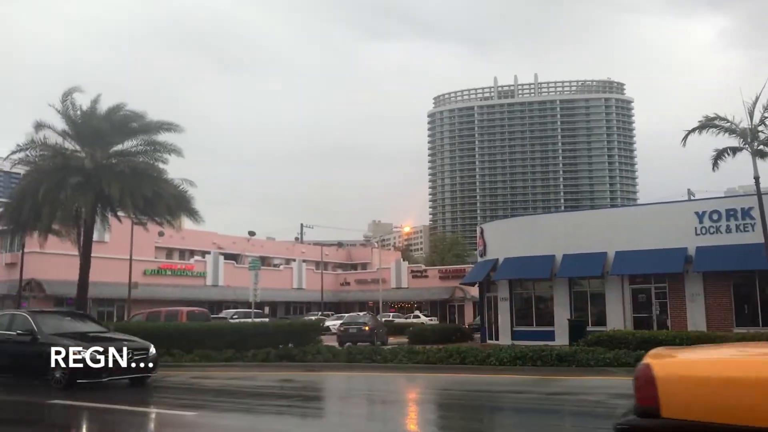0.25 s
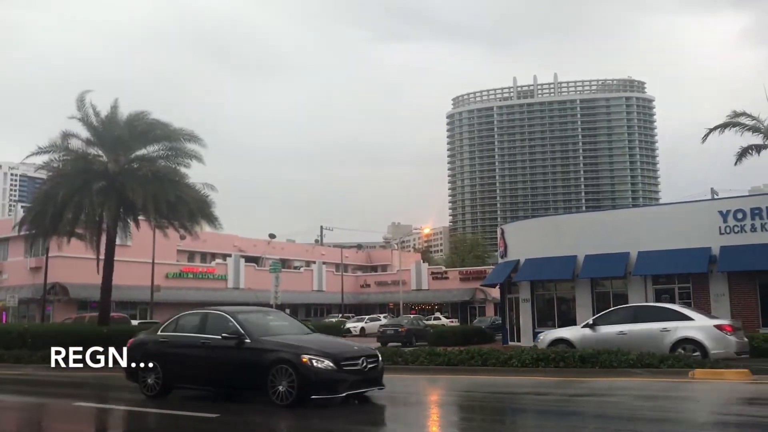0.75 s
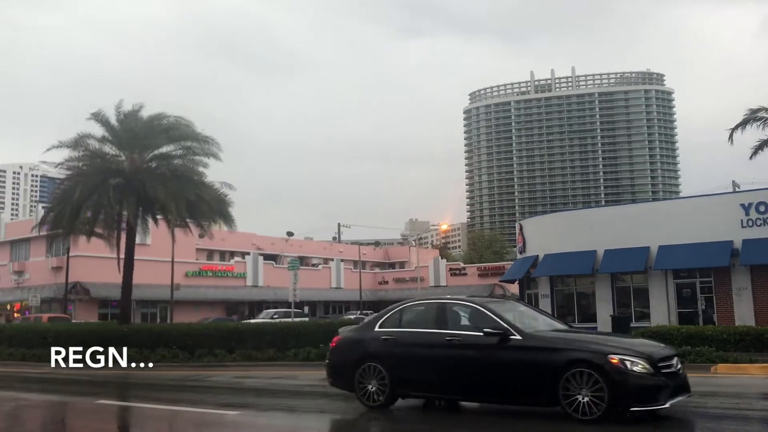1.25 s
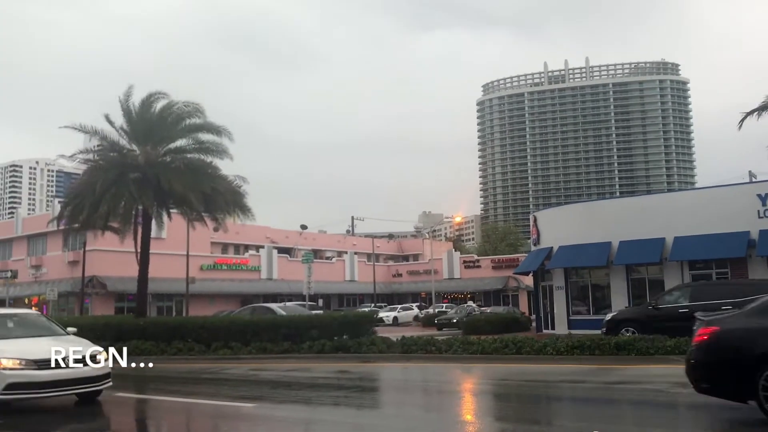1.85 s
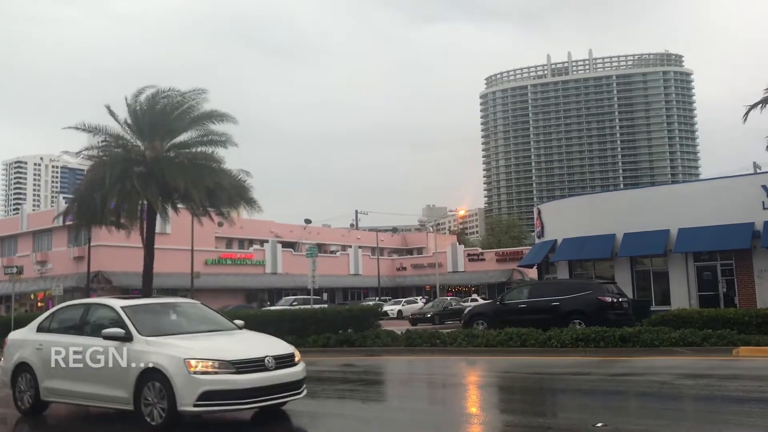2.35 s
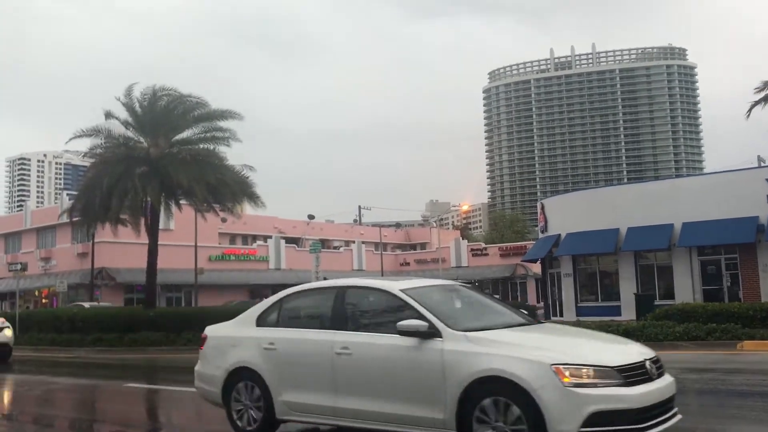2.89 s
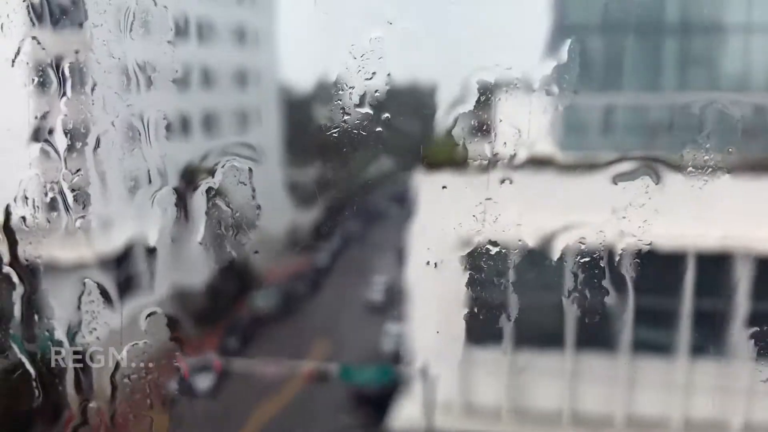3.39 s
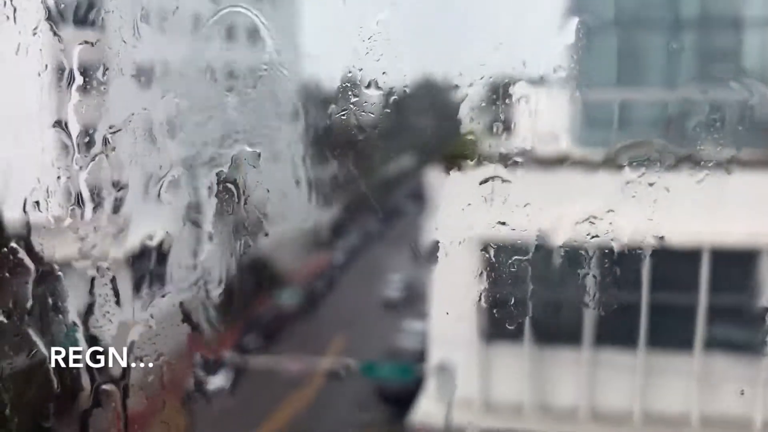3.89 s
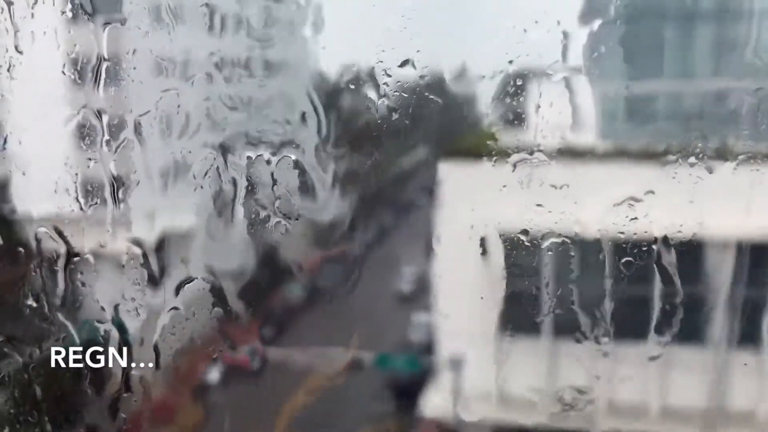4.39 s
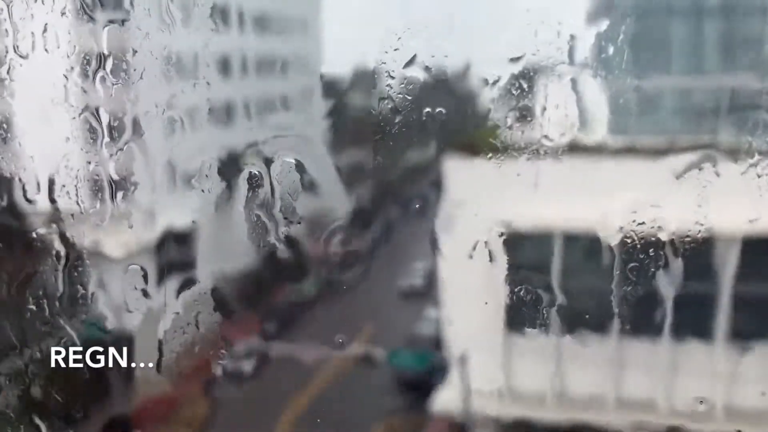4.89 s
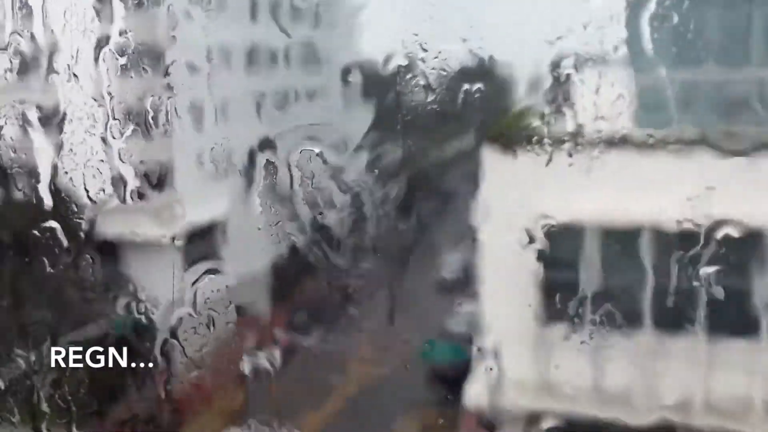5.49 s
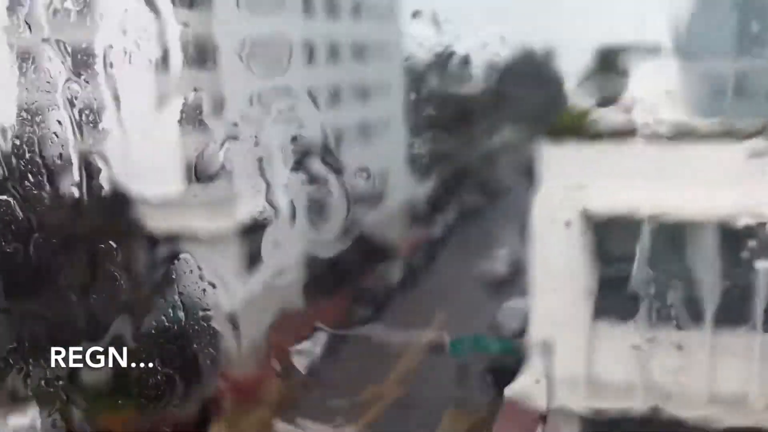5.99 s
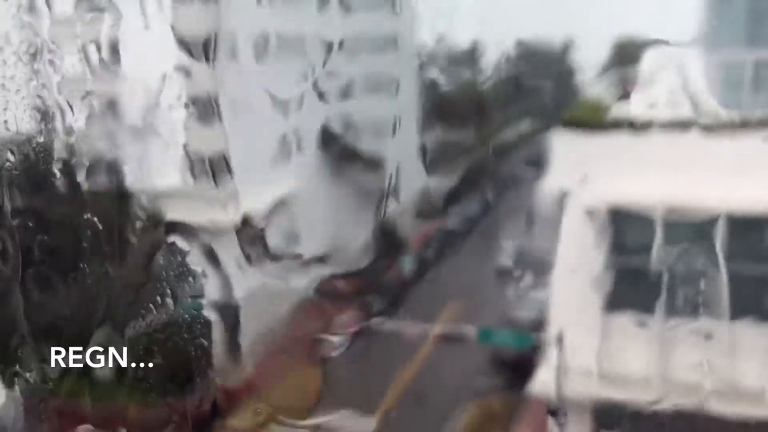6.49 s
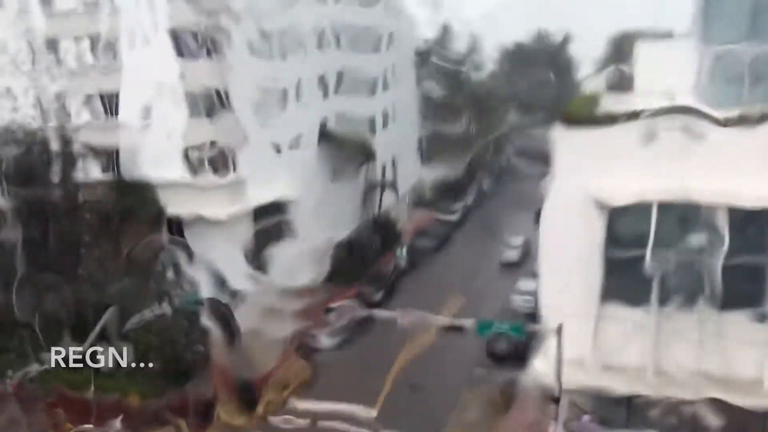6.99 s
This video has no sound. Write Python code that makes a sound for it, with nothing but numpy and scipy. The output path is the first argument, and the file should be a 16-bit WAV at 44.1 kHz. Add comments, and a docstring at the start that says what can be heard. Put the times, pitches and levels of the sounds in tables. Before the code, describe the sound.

Two joined rainy places, plain handheld microphone, mono. First the roadside: continuous watery tyre hiss, low car rumbles swelling and fading, an engine pulling away, one early handling thud. The street stops dead after about three seconds. Then inside by a window: quiet low drone and distant rain, faint tiny pings, irregular sheets of drops crackling on the pane, and sharp short taps with bright splashes, increasingly strong and glassy.

```python
"""Heavy rain in town, mono: drops as random decaying noise bursts, shaped in bands.
First, at the kerb, tyre spray hisses over noise rumble, an engine of wavering sine orders pulls away
and a thud of brief low sines bumps the microphone. After a short silence, indoors: gusts fling sheets
of drops at a pane, fat drops tick as a pitched ring, crack and spit of noise, faint sine pings sound,
one soft low thud falls, and the building rumbles (noise) and drones (wavering sines)."""
import sys
import numpy as np
from scipy import signal
from scipy.fft import rfft, irfft, next_fast_len
from scipy.io import wavfile
from scipy.ndimage import map_coordinates

SR = 44100
rng = np.random.default_rng(int(sys.argv[2]) if len(sys.argv) > 2 else 0)


def to_wav(s):
    """Save 16-bit WAV."""
    ch = np.atleast_2d(s).T  # columns
    pcm = np.round(np.clip(ch, -1, 1) * 32767)  # PCM
    wavfile.write(sys.argv[1], SR, pcm.astype(np.int16))


N = 319725
TIME_S = np.arange(N) / SR
STREET_END_S, WINDOW_START_S = 3.152, 3.204

# street noise spectra, relative: (frequency [Hz], density [dB per Hz])
ROAR_SPECTRUM = [(300, -12), (480, -7), (700, -2), (950, -0.5), (1350, -4), (1900, -8), (2800, -26)]
ROAD_RUMBLE_SPECTRUM = [(31, -16), (38, 0), (47, 0), (70, -2), (100, -4), (140, -5.5), (220, -28)]
CAR_BODY_SPECTRUM = [(90, -3.5), (140, -4.5), (230, 3.5), (310, -1), (420, -11.5), (650, -28)]
# street drop shaping, relative: (frequency [Hz], gain [dB])
SLOSH_SHAPE = [(1000, -15.5), (1700, -5), (2500, -3), (3200, -2.5), (4300, -16.5)]
SPRAY_SHAPE = [(2300, -18.5), (3400, -2), (4300, -1), (6300, -3.5), (7800, -11.5), (11000, -22)]
MIST_SHAPE = [(5000, -12.5), (7200, -1.5), (8700, -2.5), (11500, -3.5), (13500, -5), (16000, -9.5)]

# water thrown up by tyres, before trims: (time [s], spray level [dB], fine mist level [dB])
TYRE_WASH = [(0.0, -30, -32), (0.02, -31.5, -34), (0.08, -31.5, -31), (0.1, -35, -38), (0.17, -33.5, -37.5),
             (0.54, -33, -36), (1.29, -36, -39.5), (1.39, -33.5, -36), (1.59, -34, -38), (2.97, -32, -34.5),
             (3.12, -32.5, -34.5), (3.13, -35, -37)]
# level at the mean spray level, and dB per dB of spray swing
ROAR_DB, ROAR_FOLLOWS = -36, 0.36
SLOSH_DB, SLOSH_FOLLOWS = -35.5, 0.6
# roar and slosh dip briefly after the bump
DIP_S, DIP_DB, DIP_RECOVERY_S = 0.11, -5, 0.19

# cars rumble by: (peak [s], deep rumble level [dB], body noise level [dB], rise [s], fall [s])
CAR_PASSES = [(0.12, -29.5, -38, 0.65, 0.18), (0.48, -38, -32.5, 0.14, 0.55), (1.05, -32, -37, 0.25, 0.3),
              (1.63, -28.5, -37.5, 0.47, 0.5), (2.55, -34, -36, 0.73, 0.36), (3.0, -29.5, -35, 0.23, 0.24)]
# engine picks up speed evenly; its orders swell in turn
ENGINE_START_HZ, ENGINE_HZ_PER_S = 62.77, 6.4
# (order [multiple of base frequency], peak [s], level [dB], rise [s], fall [s])
ENGINE_ORDER_SWELLS = [(1, 0.28, -31, 0.11, 0.08), (1, 1.04, -25, 0.24, 0.47), (2, 1.415, -29, 0.78, 0.37),
                       (3, 1.42, -38, 1.5, 0.52)]
# nearest car booms as it draws level, rising in pitch
BOOM_S, BOOM_DB, BOOM_RISE_S, BOOM_FALL_S = 3.08, -23.5, 0.085, 0.28
BOOM_HZ, BOOM_HZ_PER_S = 87.6, 100

# low thuds, a bump on the microphone at the kerb, later one soft low thud indoors:
# (time [s], frequency [Hz], level [dB], half length [s])
THUD_MODES = [(0.0885, 168, -11.5, 0.007), (0.0885, 350, -16, 0.0045), (0.0875, 540, -21, 0.0035),
              (6.03, 158, -33, 0.04)]

# indoor noise spectra, relative: (frequency [Hz], density [dB per Hz])
ROOM_RUMBLE_SPECTRUM = [(31, -19), (38, 2), (46, 3.5), (62, -4.5), (85, 3), (115, -1.5), (160, -6.5),
                        (250, -10.5), (350, -13.5), (520, -27), (1000, -27)]
FAR_RAIN_SPECTRUM = [(400, 3.5), (1000, -1.5), (2000, -4.5), (4000, -10.5), (6500, -11.5), (9500, -15),
                     (16000, -17)]
FAR_RAIN_DB = -49
ROOM_RUMBLE_DB, ROOM_EASES_DB_PER_S = -34, 1.04
LOWER_DRONE_HZ, UPPER_DRONE_HZ = 63.9, 100.4
# lower drone: (time [s], level [dB])
LOWER_DRONE_LEVEL = [(3.2, -27), (4.05, -27.5), (4.4, -32.5), (5.45, -39), (5.75, -54), (6.1, -35),
                     (6.75, -44), (7.25, -32.5)]
# upper drone holds its level and swells once
UPPER_DRONE_DB, UPPER_SWELL_S, UPPER_SWELL_DB = -44.5, 7.04, -31

# pane drop shaping, relative: (frequency [Hz], gain [dB])
PATTER_SHAPE = [(130, 0), (300, 1.5), (470, -3), (640, -1), (850, -1.5), (1400, -0.5), (2200, -3),
                (3000, -10.5), (4500, -21)]
CRACKLE_SHAPE = [(1700, -13), (2600, 1), (3400, -0.5), (4400, -1.5), (5400, -8), (6500, -12), (9000, -10.5)]
SPLASH_SHAPE = [(4800, 4), (6800, 3), (8500, -3), (12000, 2.5), (14000, -3), (16000, -10)]
SPATTER_SHAPE = [(1200, -4), (2400, 9), (4200, 6), (6200, 3), (8500, -1), (12500, 3), (16000, -2)]
# sheets of drops, before clumping and trims:
# (peak [s], patter level [dB], fine splash level [dB re patter], rise [s], fall [s])
GUST_SHEETS = [(3.611, -41, -17, 0.002, 0.016), (3.85, -37.5, -10, 0.029, 0.051),
               (3.955, -32, -15, 0.04, 0.082), (4.155, -38, -13, 0.071, 0.077),
               (4.33, -39.5, -9, 0.015, 0.035), (4.392, -35, -17, 0.0089, 0.034),
               (4.438, -31.3, -3.5, 0.028, 0.09), (4.605, -35, -10.5, 0.12, 0.19),
               (4.84, -34, -7, 0.035, 0.033), (4.975, -37, -10.5, 0.03, 0.2),
               (5.17, -35.5, -6, 0.16, 0.049), (5.36, -43, -17, 0.19, 0.089),
               (5.52, -29.5, -11.5, 0.072, 0.093), (5.598, -31.5, -4.5, 0.065, 0.015),
               (5.775, -39, -14, 0.063, 0.15), (5.9, -36, -12, 0.15, 0.12), (6.148, -28, -8.5, 0.1, 0.036),
               (6.285, -34.5, -8.5, 0.19, 0.051), (6.535, -31.5, -9.5, 0.18, 0.12),
               (6.65, -32.5, -6, 0.11, 0.036), (6.8, -35, -9, 0.1, 0.14), (7.055, -31.5, -9, 0.039, 0.096),
               (7.21, -31, -11, 0.068, 0.12)]
# splash trails its gust; levels waver together as drops clump
SPLASH_LAG_S, CLUMP_RMS_DB, CLUMP_KNOTS_PER_S = 0.0035, 0.75, 46
# crackle at the reference patter level, and dB per dB of patter
GUST_REFERENCE_DB, CRACKLE_DB, CRACKLE_FOLLOWS = -36, -40.5, 0.91
# pane and frame resonances: (frequency [Hz], width [Hz], level before drive [dB])
PANE_MODES = [(3400, 350, -10.5), (4550, 260, -16)]
# pane rings more as the rain goes on: (time [s], drive [dB re crackle])
PANE_DRIVE = [(4.8, -29), (6.4, -2.5)]
# small drops between gusts
DRIZZLE_DB, DRIZZLE_PER_S = -59, 40

# faint thin pings: (time [s], level [dB])
PING_ONSETS = [(3.227, -48), (3.275, -55), (3.323, -54), (4.215, -49)]
# partials of each ping: (frequency [Hz], level [dB re ping])
PING_TONES = [(8430, -1.7), (13300, 0)]

# fat drops on glass, before delay and trims:
# (time [s], ring level [dB], ring frequency [Hz], splash level [dB])
FAT_DROPS = [(3.2291, -30, 1990, -56), (3.5015, -33, 1910, -60), (3.6084, -31.5, 1900, -45),
             (3.7936, -33.5, 2140, -50), (4.0087, -28, 2040, -31), (4.07, -25, 2460, -29.5),
             (4.308, -23.5, 3240, -55), (4.3124, -17.5, 3930, -54), (4.4528, -23, 2510, -26),
             (4.4634, -20.5, 2100, -36), (4.7235, -24.5, 2030, -31.5), (4.7915, -30, 3800, -42),
             (4.8378, -25, 2530, -22), (4.9693, -26.5, 3860, -39), (5.0373, -22.5, 6040, -32),
             (5.0878, -32, 3750, -25.5), (5.169, -19, 2300, -27), (5.2032, -26, 2010, -25),
             (5.6065, -15.5, 2620, -39), (5.7272, -28, 2070, -31), (5.897, -26.5, 3030, -31),
             (6.2194, -23, 2420, -35), (6.535, -16, 1800, -44), (6.682, -15.5, 3050, -26),
             (6.97, -16.5, 3900, -44), (7.1878, -26, 3420, -33)]
# time for the ring's exponential factor to fall 60 dB
RING_EXP_T60_S = 0.005
# spit of water: a snap, then a weaker spatter
SNAP_T60_S, SPIT_T60_S, SPIT_TAIL_DB = 0.003, 0.02, -12.5

# microphone port dips: (frequency [Hz], width [Hz], depth [0-1])
MIC_PORT_DIPS = [(4960, 210, 0.4), (7720, 600, 0.35), (10350, 1020, 0.5)]
CUTOFF_HZ = 15850


def from_db(db):
    """Decibels to amplitude gain."""
    return 10 ** (np.asarray(db) / 20)


def rms_one(x):
    """Scale to rms 1."""
    return x / np.sqrt(np.mean(x ** 2) + 1e-20)


def in_time(rows):
    """Interpolate each column of a curve at every sample."""
    time_s, *columns = np.transpose(rows)
    return [np.interp(TIME_S, time_s, column) for column in columns]


def swell(peak_s, rise_s, fall_s):
    """Exponential rise to gain 1 and exponential fall, one time constant per side."""
    before = (peak_s - TIME_S) / rise_s
    after = (TIME_S - peak_s) / fall_s
    return np.exp(-np.maximum(before, after).clip(0, 30))


def drift(knots_per_s):
    """Smooth random curve through evenly spaced random knots; rms 1."""
    knots = rng.standard_normal(4096)
    position = TIME_S[::32] * knots_per_s + 2
    curve = map_coordinates(knots, [position], order=3, mode="wrap")
    return rms_one(curve).repeat(32)[:N]


def colour(x, spectrum):
    """Filter to a gain curve with steep skirts past its ends; rms 1."""
    hz, db = np.transpose(spectrum)
    size = next_fast_len(N)
    f_hz = np.maximum(np.fft.rfftfreq(size, 1 / SR), 1)
    skirts = np.minimum(f_hz / hz[0], 1) ** 2 * np.minimum(hz[-1] / f_hz, 1) ** 2
    gain = from_db(np.interp(np.log(f_hz), np.log(hz), db)) * skirts
    return rms_one(irfft(rfft(x, size) * gain, size)[:N])


def noise(spectrum):
    """Steady Gaussian noise with a spectrum; rms 1."""
    return colour(rng.standard_normal(N), spectrum)


def band(x, low_hz, high_hz):
    """Causal Butterworth band-pass."""
    sos = signal.butter(2, [low_hz, high_hz], "band", fs=SR, output="sos")
    return signal.sosfilt(sos, x)


def resonance(x, hz, width_hz):
    """Two-pole resonance; rms 1."""
    return rms_one(signal.lfilter(*signal.iirpeak(hz, hz / width_hz, fs=SR), x))


def drops(shape, per_s, size_db, tint_db, t60_s):
    """Random impacts, each a decaying noise burst with its own size and band balance; rms 1."""
    at = np.flatnonzero(rng.random(N) < per_s / SR)
    # columns 0-7 tint the bands, the last sets drop size
    chance = np.clip(rng.standard_normal((len(at), 9)), -2.5, 2.5)
    edges_hz = [100, 600, 1200, 2000, 3000, 4500, 7000, 11000, 18000]
    energy_decay = from_db(-60 / t60_s / SR) ** 2
    out = np.zeros(N)
    for k, (low_hz, high_hz) in enumerate(zip(edges_hz, edges_hz[1:])):
        energy = np.zeros(N)
        energy[at] = from_db(size_db * chance[:, -1] + tint_db * chance[:, k]) ** 2
        energy = signal.lfilter([1], [1, -energy_decay], energy + 1e-12)
        envelope = np.sqrt(energy / energy.mean())
        out += envelope * band(rng.standard_normal(N), low_hz, high_hz)
    return colour(out, shape)


def wavering_tone(hz, flutter, knots_per_s):
    """Sine with random in-phase and quadrature parts, unsteady in strength and phase; rms 1."""
    phase = 2 * np.pi * np.cumsum(hz + np.zeros(N)) / SR
    in_phase = (1 + flutter * drift(knots_per_s)) * np.sin(phase)
    quadrature = flutter * drift(knots_per_s) * np.cos(phase)
    return rms_one(in_phase + quadrature)


def tyres():
    """Tread roars on asphalt and throws off water: the finer the droplets, the higher they hiss."""
    spray_db, mist_db = in_time(TYRE_WASH)
    swing_db = spray_db - spray_db[TIME_S < STREET_END_S].mean()
    dip_db = DIP_DB * swell(DIP_S, 0.012, DIP_RECOVERY_S)
    roar_db = ROAR_DB + ROAR_FOLLOWS * swing_db + dip_db
    slosh_db = SLOSH_DB + SLOSH_FOLLOWS * swing_db + dip_db
    roar = from_db(roar_db) * noise(ROAR_SPECTRUM)
    slosh = from_db(slosh_db) * drops(SLOSH_SHAPE, per_s=6000, size_db=4.0, tint_db=3.0, t60_s=0.011)
    spray = drops(SPRAY_SHAPE, per_s=7500, size_db=0.0, tint_db=1.5, t60_s=0.0093)
    mist = drops(MIST_SHAPE, per_s=7600, size_db=-1.5, tint_db=-2.0, t60_s=0.0055)
    return roar + slosh + from_db(spray_db - 0.05) * spray + from_db(mist_db + 1.33) * mist


def cars():
    """Passes add power to noise rumble; engine orders and a close boom are gliding tones."""
    rumble_power = body_power = 0
    for peak_s, rumble_db, body_db, rise_s, fall_s in CAR_PASSES:
        near = swell(peak_s, rise_s, fall_s)
        rumble_power += (from_db(rumble_db) * near) ** 2
        body_power += (from_db(body_db) * near) ** 2
    out = np.sqrt(rumble_power) * noise(ROAD_RUMBLE_SPECTRUM)
    out += np.sqrt(body_power) * noise(CAR_BODY_SPECTRUM)

    engine_hz = ENGINE_START_HZ + ENGINE_HZ_PER_S * TIME_S
    for order, peak_s, level_db, rise_s, fall_s in ENGINE_ORDER_SWELLS:
        tone = wavering_tone(order * engine_hz, flutter=0.16, knots_per_s=18)
        out += from_db(level_db) * swell(peak_s, rise_s, fall_s) * tone

    boom_hz = BOOM_HZ + BOOM_HZ_PER_S * (TIME_S - BOOM_S)
    boom = wavering_tone(boom_hz, flutter=0.22, knots_per_s=41)
    return out + from_db(BOOM_DB) * swell(BOOM_S, BOOM_RISE_S, BOOM_FALL_S) * boom


def thuds():
    """Each thud mode is a sine that swells and dies under a Gaussian envelope."""
    out = np.zeros(N)
    for time_s, hz, level_db, half_length_s in THUD_MODES:
        envelope = np.exp(-((TIME_S - time_s) / half_length_s) ** 2)
        out += from_db(level_db) * envelope * np.sin(2 * np.pi * hz * (time_s - TIME_S))
    return out


def building():
    """Muffled wind and traffic, two low throbbing drones, and the even hiss of far rain."""
    lower_db, = in_time(LOWER_DRONE_LEVEL)
    lower = from_db(lower_db) * wavering_tone(LOWER_DRONE_HZ, flutter=0.28, knots_per_s=26)
    upper_swell = from_db(UPPER_SWELL_DB) * swell(UPPER_SWELL_S, rise_s=0.15, fall_s=0.1)
    upper_gain = from_db(UPPER_DRONE_DB) + upper_swell
    upper = upper_gain * wavering_tone(UPPER_DRONE_HZ, flutter=0.44, knots_per_s=18)
    rumble_db = ROOM_RUMBLE_DB - ROOM_EASES_DB_PER_S * (TIME_S - WINDOW_START_S)
    rumble = from_db(rumble_db) * noise(ROOM_RUMBLE_SPECTRUM)
    far_rain = from_db(FAR_RAIN_DB) * noise(FAR_RAIN_SPECTRUM)
    return rumble + lower + upper + far_rain


def gusts():
    """Overlapping gusts add power; returns patter and fine splash levels in dB."""
    patter_power = splash_power = 1e-9
    for peak_s, level_db, splash_db, rise_s, fall_s in GUST_SHEETS:
        patter = from_db(level_db) * swell(peak_s, rise_s, fall_s)
        splash = from_db(level_db + splash_db) * swell(peak_s + SPLASH_LAG_S, rise_s, fall_s)
        patter_power = patter_power + patter ** 2
        splash_power = splash_power + splash ** 2
    clumps_db = CLUMP_RMS_DB * drift(CLUMP_KNOTS_PER_S)
    return 10 * np.log10(patter_power) + clumps_db, 10 * np.log10(splash_power) + clumps_db


def rain_on_pane():
    """Drops patter, crackle, ring the glass and burst into splashes; a steady drizzle lies under."""
    patter_db, splash_db = gusts()
    crackle_db = CRACKLE_DB + CRACKLE_FOLLOWS * (patter_db - GUST_REFERENCE_DB)
    drive_db, = in_time(PANE_DRIVE)
    patter = drops(PATTER_SHAPE, per_s=2000, size_db=2.5, tint_db=1.5, t60_s=0.018)
    hits = drops(CRACKLE_SHAPE, per_s=900, size_db=5.0, tint_db=5.0, t60_s=0.026)
    ringing = sum(from_db(db) * resonance(hits, hz, width_hz) for hz, width_hz, db in PANE_MODES)
    crackle = from_db(crackle_db) * (hits + from_db(drive_db) * ringing)
    splash = drops(SPLASH_SHAPE, per_s=1400, size_db=5.5, tint_db=0.5, t60_s=0.024)
    # sparser drops stand out of the wash
    spatter = drops(SPATTER_SHAPE, per_s=110, size_db=5.0, tint_db=3.0, t60_s=0.012)
    drizzle = drops(CRACKLE_SHAPE, per_s=DRIZZLE_PER_S, size_db=0.5, tint_db=2.5, t60_s=0.017)
    out = from_db(patter_db + 1.68) * patter + crackle
    out += from_db(splash_db - 0.5) * splash + from_db(splash_db + 0.5) * spatter
    return out + from_db(DRIZZLE_DB) * drizzle


def pings(t60_s):
    """Tiny, very high rings: exponentially decaying sine partials."""
    out = np.zeros(N)
    for time_s, level_db in PING_ONSETS:
        t = TIME_S[:N - round(time_s * SR)]
        decay_db = -60 * np.minimum(t / t60_s, 3)
        for hz, db in PING_TONES:
            out[-len(t):] += from_db(level_db + db + decay_db) * np.sin(2 * np.pi * hz * t)
    return out


def ticks(ring_db, crack_db, crack_t60_s, splash_db, splash_low_hz, delay_s):
    """A fat drop flattens with a crack and rings at its own pitch under a bright spit of water."""
    out, t = np.zeros(N), TIME_S[:SR // 16]
    age = np.log(1000) * t / RING_EXP_T60_S
    ring_envelope = age * np.exp(1 - age)
    crack_envelope = from_db(crack_db - 60 * t / crack_t60_s)
    spit_envelope = from_db(-60 * t / SNAP_T60_S) + from_db(SPIT_TAIL_DB - 60 * t / SPIT_T60_S)
    for time_s, level_db, hz, spit_db in FAT_DROPS:
        white = rng.standard_normal((2, len(t)))
        ring = ring_envelope * np.sin(2 * np.pi * hz * t)
        crack = rms_one(band(white[0], 0.46 * hz, 1.54 * hz)) * crack_envelope
        spit = rms_one(band(white[1], splash_low_hz, 16300)) * spit_envelope
        tick = from_db(level_db) * (from_db(ring_db) * ring + crack)
        tick += from_db(spit_db + splash_db) * spit
        start = round((time_s + delay_s) * SR)
        out[start:start + len(t)] += tick[:N - start]
    return out


def with_room(x, wet_db, t60_s):
    """Nearby walls add a short diffuse tail: convolution with decaying noise."""
    t = TIME_S[:SR // 3]
    echoes = rng.standard_normal(len(t)) * from_db(-60 * t / t60_s) * (t > .002)
    tail = signal.fftconvolve(x, echoes / np.linalg.norm(echoes))[:N]
    return x + from_db(wet_db) * tail


def scene():
    """The street stops dead; a moment later the window fades in."""
    street_gate = np.clip((STREET_END_S - TIME_S) / .003 + 1, 0, 1)
    street = (tyres() + cars()) * street_gate
    low_thuds = thuds()
    window = building() + rain_on_pane() + pings(t60_s=0.11)
    taps = ticks(ring_db=-1.5, crack_db=-6.0, crack_t60_s=0.012,
                 splash_db=6.5, splash_low_hz=8200, delay_s=0.0006)
    window += with_room(taps, wet_db=-6.0, t60_s=0.079)
    window *= np.clip((TIME_S - WINDOW_START_S) / .012, 0, 1)
    return np.tile(street + window + low_thuds, (2, 1))


def record(dry):
    """The microphone port notches the treble; an elliptic low-pass cuts the top."""
    for hz, width_hz, depth in MIC_PORT_DIPS:
        dry = dry - depth * signal.lfilter(*signal.iirpeak(hz, hz / width_hz, fs=SR), dry)
    return signal.sosfilt(signal.ellip(12, .1, 80, CUTOFF_HZ, fs=SR, output="sos"), dry)


dry = scene()
out = record(dry)
to_wav(out)
```